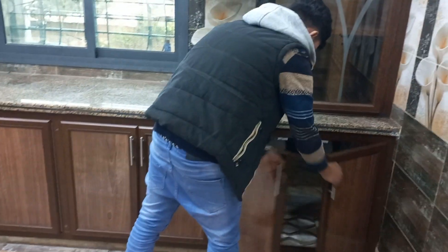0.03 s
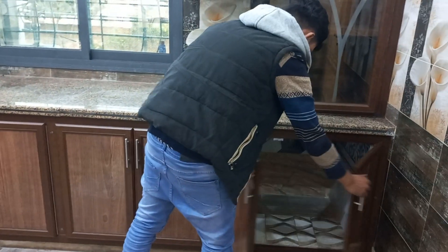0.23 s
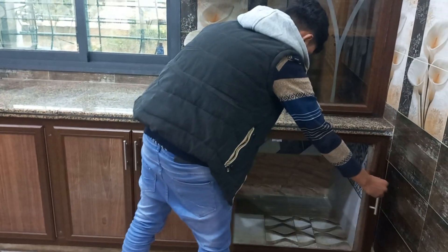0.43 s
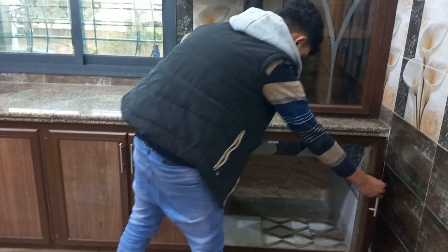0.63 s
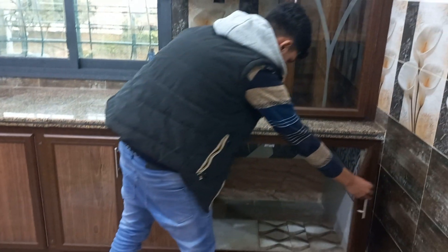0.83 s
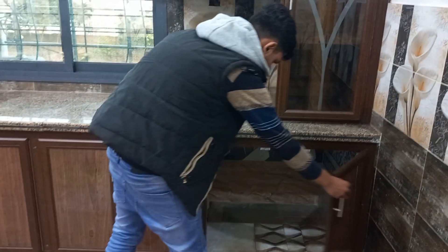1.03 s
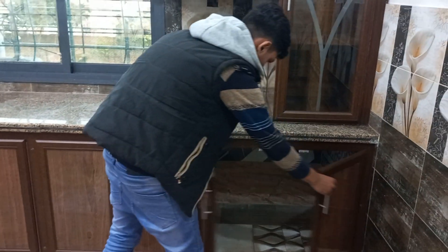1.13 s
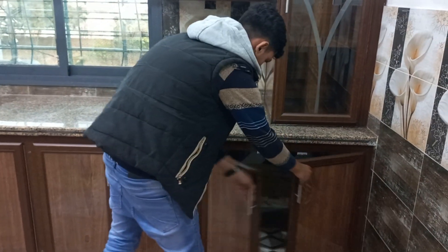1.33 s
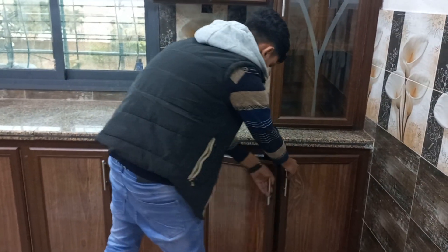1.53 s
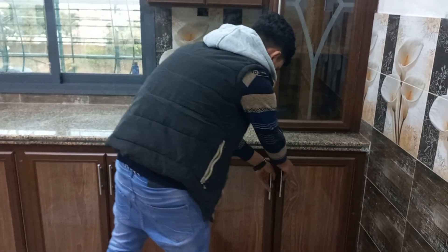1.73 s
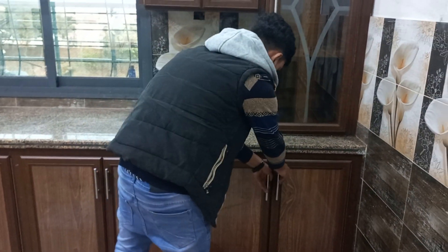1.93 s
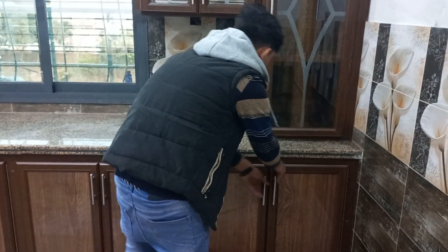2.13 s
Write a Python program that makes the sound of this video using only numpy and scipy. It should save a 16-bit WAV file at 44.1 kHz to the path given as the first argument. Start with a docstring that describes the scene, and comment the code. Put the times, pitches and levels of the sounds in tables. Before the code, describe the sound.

Two light metal-framed cabinet doors in a tiled kitchen: a fading pull-open thud, a clattering knock at the stop, a pause, a juddering hinge, then two sharp closing bangs, heard in stereo from a few metres.

```python
"""Two aluminium cabinet doors in a tiled kitchen, a few metres from a stereo microphone.
Just pulled open: the right one hits its stop, the left judders on its hinge, both are knocked shut in turn.
Frames clatter as coloured noise bursts, panels boom as decaying sine modes, the room adds a tail by band.
Hinges and handles tick as narrow noise bursts; a padded jacket rustles over faint steady room noise."""
import sys
import numpy as np
from scipy import signal
from scipy.fft import irfft, next_fast_len
from scipy.io import wavfile
from scipy.ndimage import uniform_filter1d

SR = 44100
rng = np.random.default_rng(int(sys.argv[2]) if len(sys.argv) > 2 else 0)


def master(y):
    """Save y as 16-bit WAV."""
    cut = np.clip(np.atleast_2d(y).T, -1, 1)
    pcm = np.round(cut * 32767)  # scale
    wavfile.write(sys.argv[1], SR, pcm.astype(np.int16))


N = 96579
FREQS_HZ, TIME_S = np.fft.rfftfreq(SR, 1 / SR), np.arange(N) / SR

# Every t60 is the early rate of decay; TAIL_BEND_S steepens it late.
# Clatter spectrum of frame and panel, relative: f/Hz, density/dB
CLATTER = [(25, -44), (42, -5.5), (62, 3), (100, 0), (150, -2), (300, 3.5), (450, -2.5), (700, -0.5),
           (1000, -3), (1500, -5), (2700, -4.5), (3500, -8.5), (5300, -10), (6900, -12), (7800, -22.5),
           (10000, -21.5), (12000, -17.5), (15800, -26.5)]
# Frame resonances and hollows: f/Hz, width/octaves, gain/dB
CATCH_FRAME = [(410, 0.24, -4.5), (767, 0.31, -7.5), (1070, 0.17, 6.5), (1705, 0.079, 8.5),
               (3700, 0.18, -4), (4900, .03, 2)]
OPEN_FRAME = [(637, .15, 0.5), (1230, 0.15, -2), (1607, 0.086, 6), (1970, 0.135, 3), (3400, .15, -2),
              (4270, 0.13, 6), (5350, 0.068, 6)]
LEFT_FRAME = [(555, 0.54, -7), (1040, .1, 3.5), (1210, 0.063, 4.5), (1520, 0.061, 1.5), (3460, 0.056, -7),
              (3720, 0.28, 4), (4620, 0.035, -7), (5280, 0.19, 3.5), (15000, 0.24, 1.5)]
RIGHT_FRAME = [(770, 0.043, 3.6), (915, 0.2, 4.2), (1555, 0.059, 2.3), (2350, .1, 2.2), (3000, 0.13, 3),
               (5020, 0.14, 3), (12500, 0.034, 2.6), (14800, 0.22, 6.7)]
# Blows on the doors: t/s, rise/s, level/dB, boom/dB, body/dB, clack/dB, sizzle/dB, frame
BLOWS = [(0.0, 0.00067, -42.5, 8, 10.5, 8, -4, CATCH_FRAME),
         (0.0974, 0.0047, -34, -8, -5, -17.5, -8.5, CATCH_FRAME),
         (0.5585, 0.0065, -21, 0, 5.5, 5, 1, OPEN_FRAME), (.594, .003, -29.5, 4, 12, 7, -4.5, OPEN_FRAME),
         (1.513, 0.0015, -35.5, -1, 17, 2.5, 0, LEFT_FRAME),
         (1.528, 0.0031, -34.5, -3, 14, 4, -0.5, LEFT_FRAME),
         (1.689, 0.0028, -17, 0, -4.5, 2, 5.5, LEFT_FRAME),
         (1.8836, 0.00075, -18, -11, -5, 1.5, 3.5, RIGHT_FRAME),
         (1.8934, 0.0011, -20, 4, -4, 2, -2.5, RIGHT_FRAME)]
# Panel modes, doors just pulled: f/Hz, level/dB, t60/s
PULLED_DOOR = [(61.4, -7.5, 0.97), (72.4, 3.5, 0.46), (141, -3, .8), (214, -3.5, 0.55), (258, 1, 0.65),
               (295, -10, 1), (372, -2, 0.5), (994, -16.5, 0.78), (1123, -17, 0.91)]
# Panel modes, right door standing open: f/Hz, level/dB, t60/s
OPEN_DOOR = [(101.4, -11, 0.5), (136.4, -8.5, 1), (144.5, 5, 0.62), (211.3, -6.5, 0.75), (250.1, 0, 0.73),
             (272, -6.5, 0.41), (303.2, -11, .65), (316, -9.5, 0.59), (338.6, -1, 0.54), (358.5, -8, 0.67),
             (576, -14, 0.59), (618, -17.5, 0.27), (788, -14.5, 0.64)]
# Panel modes, left and right door knocked shut: f/Hz, level/dB, t60/s
LEFT_DOOR = [(52.6, 0, 0.88), (134.2, -4.5, 0.93), (187.4, 0, 0.43), (206.7, 7.5, 0.31), (242.3, -3, 0.67),
             (308.6, -5.5, 0.95), (969, -9.5, 1), (1497, -9, 0.99), (2560, -16, 0.46), (3321, -14, 0.69),
             (5120, -7, 0.51)]
RIGHT_DOOR = [(68.8, -8.5, 0.8), (72.8, 5.5, 0.42), (134.3, -1.5, 0.4), (154.7, -2.5, 0.37),
              (249.8, -13, 0.74), (297.1, 0, 0.22), (722, -14, 0.15), (737, 2, 0.25), (824, -18, 0.21),
              (950, -12, 0.55), (1230, -11, 0.35), (1560, -3, 0.47), (2260, -23, 0.23), (2480, -18, .4)]
# Blows that ring a panel: t/s, level/dB, swell/s, modes
PANEL_RINGS = [(0.0, -37.5, 0.005, PULLED_DOOR), (.564, -21.5, 0.022, OPEN_DOOR),
               (1.691, -23.5, 0.024, LEFT_DOOR), (1.886, -15, 0.058, RIGHT_DOOR)]
# Steady room noise spectrum, relative: f/Hz, density/dB
HISS = [(18, -62), (30, -32.5), (49, 3), (179, 7), (437, 5.5), (569, 0), (937, -3), (1860, 6.5), (2170, 5),
        (6550, -0.5), (8520, -16), (12600, -9.5), (16000, -39)]
# Ticks and bumps of hinges, handles and panels: t/s, level/dB, centre f/Hz, width/octaves
TICKS = [(.164, -45.5, 242, 0.57), (0.221, -55, 61.2, 0.11), (.3, -55.5, 705, 1.8),
         (0.302, -49, 1540, 0.39), (.305, -56, 4630, 0.49), (.41, -63.5, 915, .18),
         (.74, -52.5, 9000, 0.86), (.862, -56.5, 9000, 1.9), (1.025, -60.5, 449, 0.084),
         (1.21, -68.5, 430, 0.21), (1.461, -51, 1200, 1), (1.476, -45, 673, 1.7)]
# Dry handle clicks: t/s, level/dB, centre f/Hz, width/octaves
CLICKS = [(0.496, -46.5, 2042, 0.17), (0.495, -52, 5270, 0.4), (0.527, -54, 5000, .5)]
# Jacket rustle envelope: t/s, level/dB
RUSTLE = [(1.0, -84), (1.225, -74.5), (1.245, -60.5), (1.32, -62.5), (1.36, -61), (1.45, -65), (1.6, -73.5)]
# Jacket rustle spectrum, relative: f/Hz, density/dB
RUSTLE_COLOUR = [(200, -35.5), (1500, -2), (6000, -8), (8000, -15.5), (13000, -13), (16000, -25.5)]
# Slips of the left hinge: t/s, level/dB
SLIPS = [(1.484, -29), (1.532, -20.5), (1.568, -19.5), (1.617, -25), (1.648, -24.5), (1.679, -24.5)]
# Modes of the juddering door: f/Hz, level/dB, t60/s
JUDDER = [(142.7, -13, 0.44), (222, -17, 0.26), (255.3, -9.5, .35), (351.4, -4.5, 0.17), (367.7, 3, 0.16),
          (503.3, -14.5, 0.34), (624, -11, 0.13), (671, -17.5, 0.19), (785, -18, 0.45), (850, -21, 0.4)]
# Kitchen decay: f/Hz, t60/s
ROOM = [(50, 0.88), (120, 0.97), (250, 0.79), (500, 0.71), (1000, 0.56), (2000, 0.7), (4000, 0.65),
        (7000, 0.58), (11000, 0.42), (16000, .33)]
# Early reflections relative to the tail: f/Hz, level/dB
EARLY = [(100, -17), (500, -19), (2000, -23), (6000, -18), (12000, -7.5)]
# Likeness of the two microphone signals: f/Hz, left-right correlation
ALIKE = [(60, .992), (150, .97), (350, .94), (550, .5), (1000, .15), (1900, -.17), (3500, 0), (15000, 0)]
# Stereo balance: f/Hz, left over right/dB
BALANCE_DB = [(60, 2.2), (550, 1.1), (1000, 0), (1900, -5.5), (4000, -5), (6400, -3), (8500, 1.5),
              (14000, 0.2)]

BOOM_HZ, BODY_HZ, CLACK_HZ, EDGE_HZ, SIZZLE_HZ = 70, 248, 890, 4870, 12400
RIPPLE_DB, RIPPLE_HZ = 2.0, 45  # unevenness of the clatter spectrum, and its spacing
CHATTER_DB, CHATTER_HZ, CHATTER_T60_S = 1.4, 401, 0.6
EARLY_T60_S, TAIL_BEND_S = 0.11, 0.77
BASS_LAG_S, LAG_HZ = 0.012, 250  # extra build-up in the bass, and where it fades out
HISS_DB = -60.5
TICK_RISE_S, CLICK_RISE_S, CLICK_T60_S = 0.0024, 0.001, 0.04
JUDDER_SWELL_S = 0.0053
SUPPRESS_DB, OPEN_DB = -4, 8.5  # suppressor depth; height above the floor at which it is half released
LOW_CUT_HZ, HIGH_CUT_HZ = 42, 16000


def amp(db):
    """Amplitude factor for a level in dB."""
    return 10 ** (np.asarray(db) / 20)


def read(points, hz):
    """Interpolates a table on a log-frequency axis."""
    table_hz, value = np.transpose(points)
    return np.interp(np.log(hz + 1), np.log(table_hz + 1), value)


def add(mix, start_s, sound):
    """Mixes a sound in from start_s, cut at the end of the mix."""
    part = mix[:, max(round(start_s * SR), 0):][:, :sound.shape[1]]
    part += sound[:, :part.shape[1]]


def fade(t, t60_s):
    """Exponential decay, 60 dB per t60, that steepens late in the tail."""
    return np.exp(-np.log(1000) * t / t60_s - (t / TAIL_BEND_S) ** 3)


def hump(hz, octaves):
    """Gain of one broad resonance."""
    return 1 / (1 + (np.log2((FREQS_HZ + 1) / hz) / octaves) ** 4)


def diffuse(gain):
    """Spectrum of coloured stereo noise, rms 1 before balance, correlated by band as in a diffuse field."""
    hz = np.linspace(0, SR / 2, len(gain))
    shared, other = np.exp(2j * np.pi * rng.random((2, len(hz))))
    alike = np.clip(read(ALIKE, hz), -1, 1)
    lean_db = read(BALANCE_DB, hz) / 2
    left = shared * amp(lean_db)
    right = (alike * shared + np.sqrt(1 - alike ** 2) * other) * amp(-lean_db)
    unit_gain = gain / np.linalg.norm(gain) * len(hz) * np.sqrt(2)
    return np.array([left, right]) * unit_gain


def burst(spectrum, rise_s):
    """Blow heard through the room: build-up slower in the bass, early reflections, tail by band."""
    t, out = TIME_S[:SR], 0
    log_hz = np.log(FREQS_HZ + 1)
    log_centres = np.log([hz for hz, _ in ROOM])
    for (hz, t60_s), pick in zip(ROOM, np.eye(len(ROOM))):
        band_gain = np.interp(log_hz, log_centres, pick)  # overlapping triangles
        band = irfft((spectrum * band_gain).astype(np.complex64))[:, :SR]
        band_rise_s = rise_s + BASS_LAG_S / (1 + (hz / LAG_HZ) ** 2)
        attack = 1 - np.exp(-t / band_rise_s)
        early = amp(read(EARLY, hz)) * fade(t, EARLY_T60_S)
        out = out + band * attack * (fade(t, t60_s) + early)
    return out


def ring(modes, swell_s):
    """Sum of decaying sine modes, out of step between microphones where the sides are unlike."""
    t, out = TIME_S[:SR], 0
    sides = np.array([[0.5], [-0.5]])
    for (hz, db, t60_s), skew in zip(modes, rng.standard_normal(len(modes))):
        phase = sides * skew * np.arccos(np.clip(read(ALIKE, hz), -1, 1))
        level = amp(db + sides * read(BALANCE_DB, hz))
        out = out + level * fade(t, t60_s) * np.sin(2 * np.pi * hz * t + phase)
    return out * (1 - np.exp(-t / swell_s))


def frame_tint_db(frame):
    """Gain in dB of a frame's broad resonances at each frequency."""
    return sum(db * np.exp(-(np.log2((FREQS_HZ + 1) / hz) / octaves) ** 2) for hz, octaves, db in frame)


def chatter():
    """Loose parts: quick uneven flutter of level that settles after the blow."""
    t = TIME_S[:SR]
    flutter = np.interp(t * CHATTER_HZ, np.arange(SR), rng.standard_normal(SR))
    return amp(CHATTER_DB * flutter * fade(t, CHATTER_T60_S))


def frame_clatter():
    """Each blow excites the crowded frame modes, heard as coloured noise."""
    out = np.zeros((2, N))
    grid_hz = np.arange(4000) * RIPPLE_HZ
    ripple = np.interp(FREQS_HZ, grid_hz, rng.standard_normal(len(grid_hz)))
    clatter_db = read(CLATTER, FREQS_HZ) + RIPPLE_DB * ripple
    for start_s, rise_s, db, boom, body, clack, sizzle, frame in BLOWS:
        tone = [(BOOM_HZ, boom), (BODY_HZ, body), (CLACK_HZ, clack), (EDGE_HZ, 0), (SIZZLE_HZ, sizzle)]
        blow_db = db + read(tone, FREQS_HZ) + frame_tint_db(frame)
        spectrum = diffuse(amp(clatter_db)) * amp(blow_db)
        add(out, start_s, burst(spectrum, rise_s) * chatter())
    return out


def panel_boom():
    """Hard blows ring the panel's separate modes."""
    out = np.zeros((2, N))
    for start_s, db, swell_s, modes in PANEL_RINGS:
        add(out, start_s, amp(db) * ring(modes, swell_s))
    return out


def steady_noise(colour):
    """Stationary stereo noise of the given spectrum over the whole scene."""
    hz = np.fft.rfftfreq(next_fast_len(N, True), 1 / SR)
    return irfft(diffuse(amp(read(colour, hz))))[:, :N]


def room_noise():
    """Faint steady noise of the room."""
    return amp(HISS_DB) * steady_noise(HISS)


def ticks():
    """Small knocks: noise humps heard through the room."""
    out = np.zeros((2, N))
    for start_s, db, hz, octaves in TICKS:
        add(out, start_s, amp(db) * burst(diffuse(hump(hz, octaves)), TICK_RISE_S))
    return out


def handle_clicks():
    """Dry clicks: noise humps with a short decay and no room."""
    out, t = np.zeros((2, N)), TIME_S[:SR]
    shape = (1 - np.exp(-t / CLICK_RISE_S)) * fade(t, CLICK_T60_S)
    for start_s, db, hz, octaves in CLICKS:
        add(out, start_s, amp(db) * irfft(diffuse(hump(hz, octaves))) * shape)
    return out


def jacket_rustle():
    """Padded cloth rubs as the arms sweep in: noise under a level envelope."""
    level_db = np.interp(TIME_S, *np.transpose(RUSTLE))
    return amp(level_db) * steady_noise(RUSTLE_COLOUR)


def hinge_judder():
    """The left hinge sticks and slips; each slip rings the door's modes."""
    out = np.zeros((2, N))
    for start_s, db in SLIPS:
        add(out, start_s, amp(db) * ring(JUDDER, JUDDER_SWELL_S))
    return out


def scene():
    """Sum of all sources."""
    doors = frame_clatter() + panel_boom()
    small_parts = ticks() + handle_clicks() + hinge_judder()
    return doors + room_noise() + small_parts + jacket_rustle()


def record(dry):
    """Recorder: a soft noise suppressor turns down what lies near the floor, then band limits."""
    z = signal.stft(dry, nperseg=1024, noverlap=768)[2]
    power = (abs(z) ** 2).mean(0)
    power = uniform_filter1d(power, size=5, axis=0)  # over frequency
    power = abs(uniform_filter1d(power, size=7, axis=1))  # over time
    floor = np.percentile(power, 10, axis=1, keepdims=True) + 1e-20
    above_floor = power / floor / amp(OPEN_DB) ** 2
    gain = amp(SUPPRESS_DB / (1 + above_floor ** 2))
    quiet = signal.istft(z * gain, nperseg=1024, noverlap=768)[1][:, :N]
    high_pass = signal.butter(6, LOW_CUT_HZ, "high", fs=SR, output="sos")
    low_pass = signal.firwin(401, HIGH_CUT_HZ, window=("kaiser", 9), fs=SR)
    return signal.oaconvolve(signal.sosfilt(high_pass, quiet), low_pass[None], "same")


dry = scene()
out = record(dry)
master(out)
```